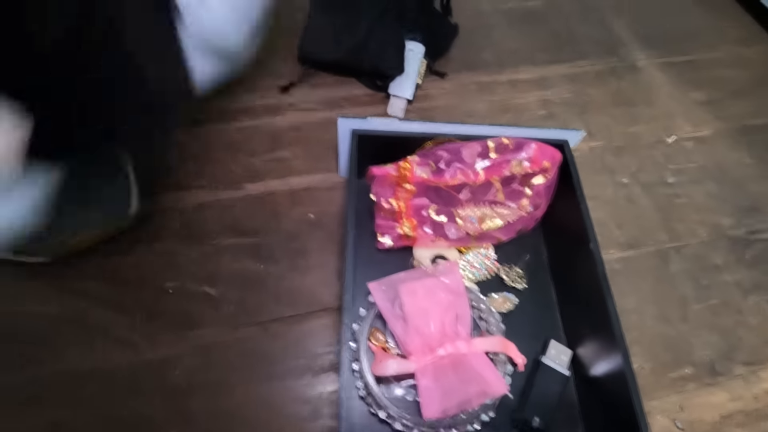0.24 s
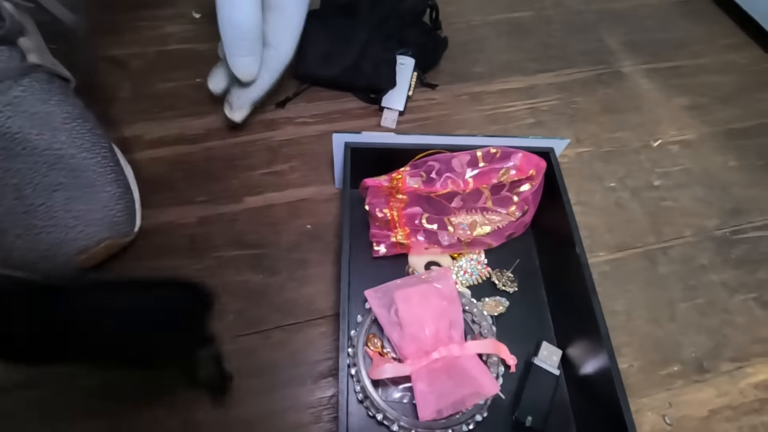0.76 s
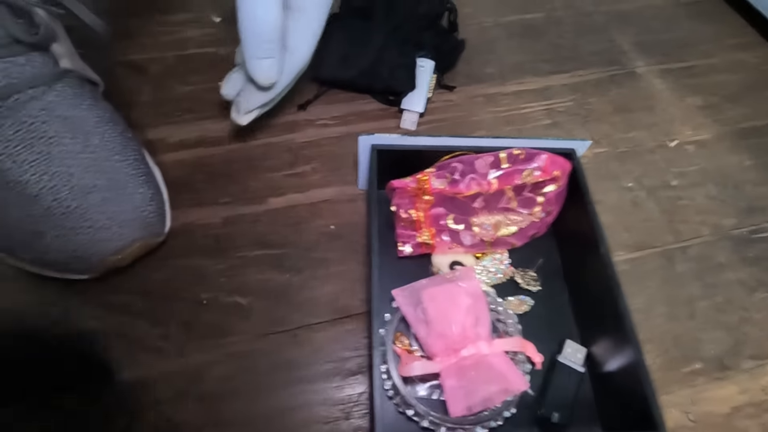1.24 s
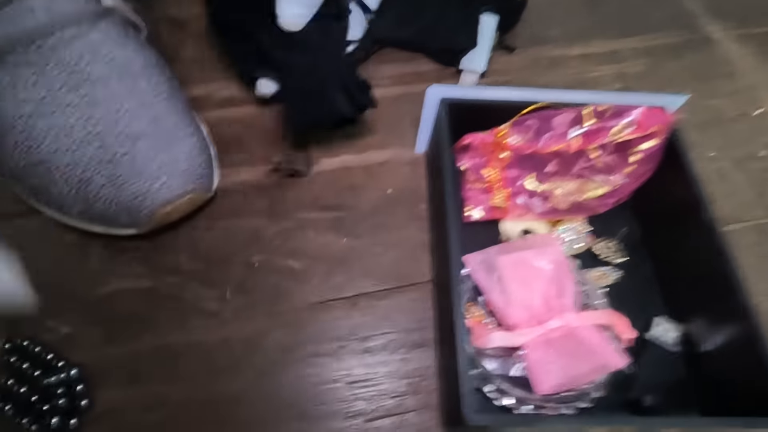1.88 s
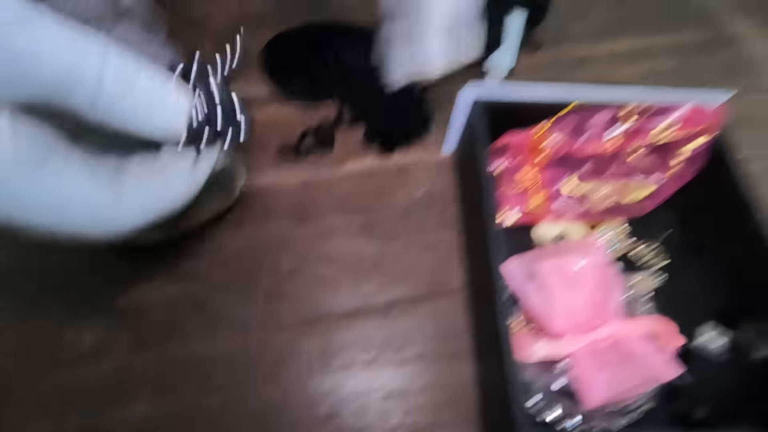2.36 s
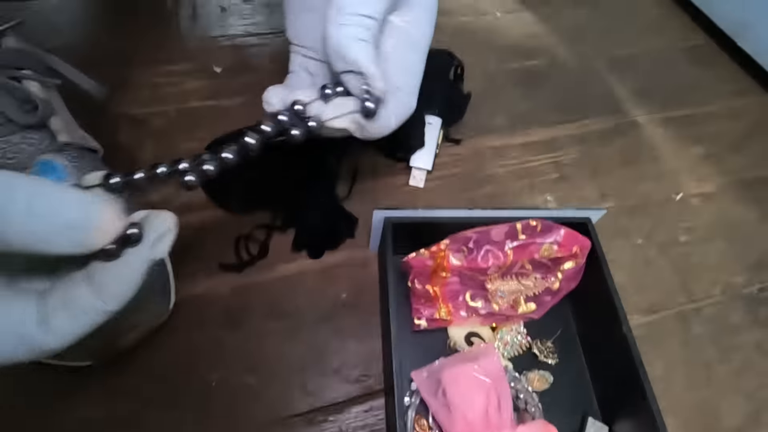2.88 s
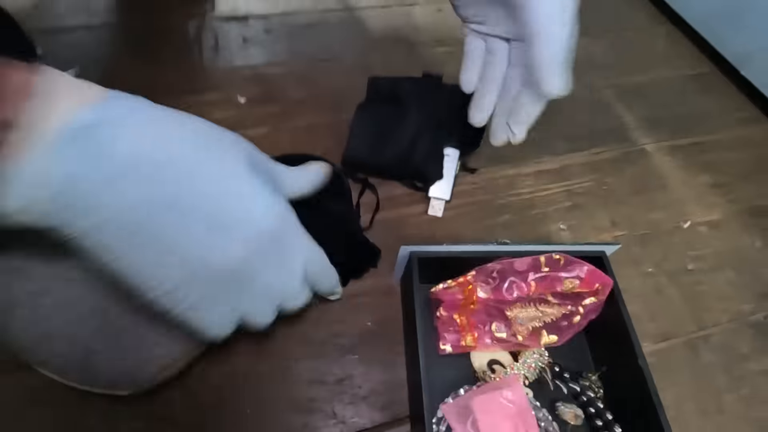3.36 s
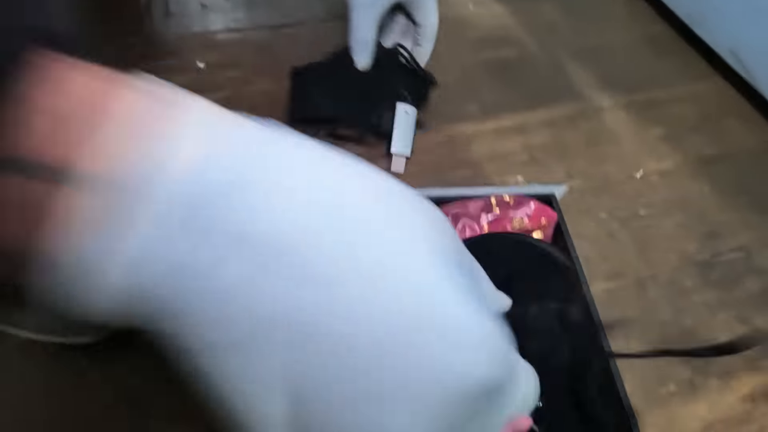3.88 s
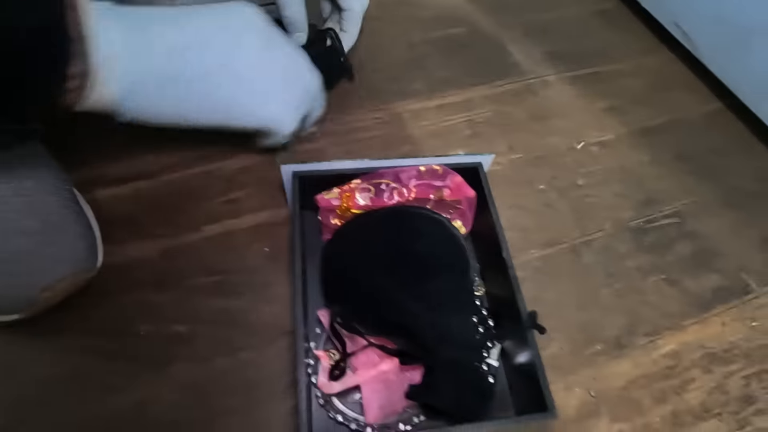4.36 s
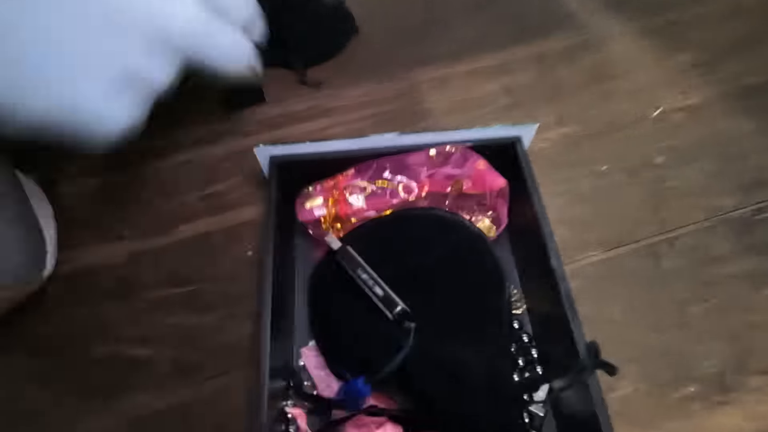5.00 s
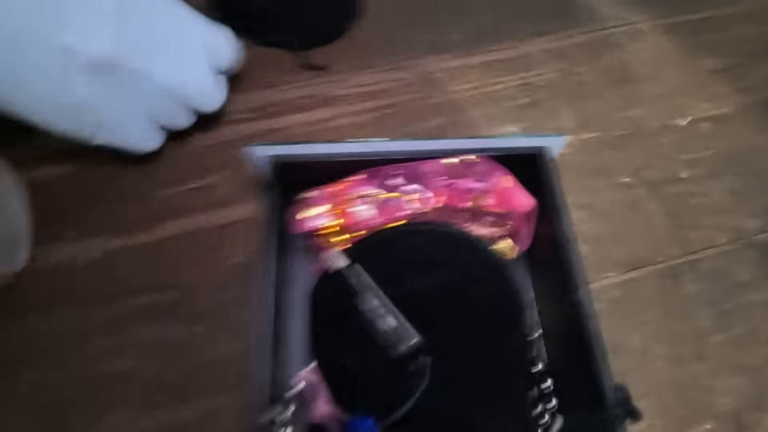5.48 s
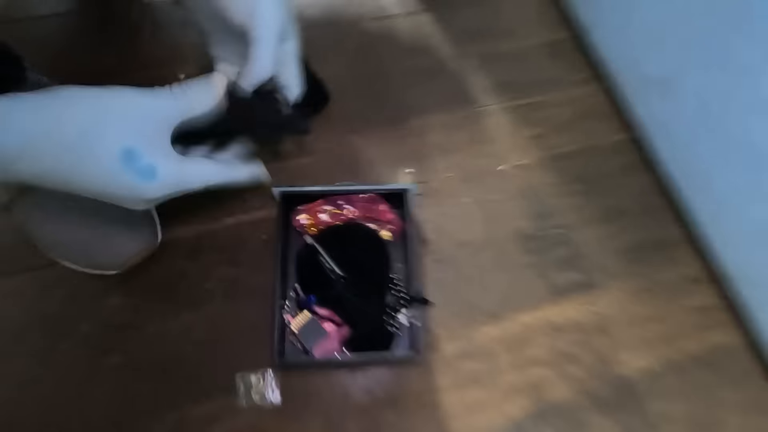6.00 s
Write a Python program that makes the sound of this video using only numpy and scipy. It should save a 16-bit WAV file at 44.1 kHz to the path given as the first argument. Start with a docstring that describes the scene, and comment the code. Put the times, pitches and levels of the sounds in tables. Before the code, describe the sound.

Gloved hands rustle cloth pouches and click beads in a bare room, dropping them sharply into a box before tossing in small plastic things.

```python
"""Beads in a cloth pouch knock on a wooden floor as gloved hands sort jewellery in a bare room.
The string of beads is drawn out, clicking, and dropped into a box; small plastic things are tossed after it.
Impacts are modal: a noise crack excites decaying modes. Cloth, gloves and a sliding shoe are
stick-slip friction, filtered by colour or resonance. A diffuse tail and a low rumble give the room."""
import sys
import numpy as np
from scipy import signal
from scipy.fft import rfft, irfft, next_fast_len
from scipy.io import wavfile
from scipy.ndimage import uniform_filter1d

SR = 44100
rng = np.random.default_rng(int(sys.argv[2]) if len(sys.argv) > 2 else 0)


def dump(signal):
    """Clip the signal to [-1, 1] and save it as 16-bit WAV at the path in sys.argv[1]."""
    limited = np.clip(np.atleast_2d(signal).T, -1, 1)
    pcm = np.round(limited * 32767).astype(np.int16)
    wavfile.write(sys.argv[1], SR, pcm)


N = 275184
TIME = np.arange(N) / SR
HIT_SIZE = 8192  # samples given to one impact or tick
SPOT_DB, SPOT_Q = 2, 4.2  # usual strength and sharpness of the pitch favoured by the spot struck
GAP_SPREAD = 0.06  # unevenness of the gaps in a run, as a share of the gap
BOX_GAP_S, BOX_LOSS_DB = 0.003, 5.5  # from one contact at the box to the next

# Table levels are relative within their layer; layer gains may follow.
# Ringing modes of the floorboards: pitch_hz, level_db, t60_s
FLOOR_MODES = [(340, -12.5, 0.11), (385, -17.5, 0.07), (555, -11.5, .05), (1030, -6.5, .055),
               (1075, -19, 0.18), (1155, -8, 0.035), (1495, -5, 0.055), (1660, -7, 0.025),
               (2250, -13, .025)]


def from_db(db):
    """Decibels as an amplitude ratio."""
    return 10 ** (np.asarray(db) / 20)


def rms_one(x):
    """Normalisation to unit root-mean-square amplitude."""
    return x / np.sqrt(np.mean(x ** 2) + 1e-20)


def in_time(rows):
    """Linear interpolation of a time curve at every sample."""
    times, values = np.transpose(rows)
    return np.interp(TIME, times, values)


def swell(middle_s, length_s):
    """Gaussian envelope, down to exp(-2) one length either side of its middle."""
    return np.exp(-2 * np.minimum(((TIME - middle_s) / length_s) ** 2, 20))


def at_hz(points, hz):
    """Interpolation of a spectrum on a logarithmic frequency axis."""
    f, value = np.transpose(points)
    return np.interp(np.log(np.maximum(hz, 1)), np.log(f), value)


def colour(x, spectrum):
    """Causal minimum-phase filter: folding the cepstrum forward turns a magnitude into a response."""
    half = next_fast_len(x.shape[-1] // 2 + 1024)
    magnitude = from_db(at_hz(spectrum, np.linspace(0, SR / 2, half + 1)))
    cepstrum = irfft(np.log(magnitude))
    cepstrum[1:half] *= 2
    cepstrum[half + 1:] = 0
    response = np.exp(rfft(cepstrum))
    return irfft(rfft(x, 2 * half) * response)[..., :x.shape[-1]]


def resonance(x, hz, q):
    """Second-order resonance around one pitch, with unit gain at its peak."""
    return signal.lfilter(*signal.iirpeak(hz, max(q, 1), fs=SR), x)


def drift(rate):
    """Band-limited chance: normal random values, rate per second, joined by straight lines."""
    knots = rng.standard_normal(4096)
    return np.interp(TIME * rate, np.arange(len(knots)), knots)


def friction(per_s, spread_db, grain_share):
    """Stick-slip friction: fibres catch and slip as clicks of uneven size within a smooth hiss."""
    sizes = from_db(spread_db * np.minimum(rng.exponential(1, N), 4)) * rng.choice([-1, 1], N)
    chance = per_s * from_db(4 * drift(35)) / SR
    grains = sizes * (rng.random(N) < chance)
    smooth = rng.standard_normal(N)
    share = np.clip(grain_share, 0, 1)  # share of the power
    return np.sqrt(share) * rms_one(grains) + np.sqrt(1 - share) * rms_one(smooth)


def evened(burst):
    """Spectral whitening: broad humps of a noise burst are levelled and only fine detail stays random."""
    power = uniform_filter1d(np.abs(rfft(burst)) ** 2, size=110)
    inverse_db = -10 * np.log10(power)
    return colour(burst, np.column_stack([np.linspace(1, SR / 2, len(power)), inverse_db]))


def runs(rows, gap_s, loss_db):
    """Repeated impact: a loose piece strikes at near-even gaps, losing level at each contact."""
    hits = []
    for s, contacts, level_db, *tone in rows:
        for k in range(round(contacts)):
            unevenness = min(k, 1) * GAP_SPREAD * rng.standard_normal()  # the first contact is on time
            hits.append((s + gap_s * (k + unevenness), level_db - loss_db * k, *tone))
    return hits


def strikes(hits, modes, crack, split_hz, crack_t60, ring_db, rattle_db, rattle_t60,
            size_spread=0, spot_db=SPOT_DB, spot_q=SPOT_Q):
    """Modal impact: a short contact crack and the body's decaying modes, then a rattle of tiny rebounds."""
    t, out = np.arange(HIT_SIZE) / SR, np.zeros(N + HIT_SIZE)
    attack = slice(0, 176)  # the first 4 ms, where levels are matched
    hz, mode_db, t60 = np.transpose(modes)[:, :, None]
    for s, level_db, bright_db, *spot in hits:
        noise, chatter = rng.standard_normal((2, HIT_SIZE))
        pressing = np.minimum(t / 0.00032, 1)  # the contact builds up over a moment
        contact = colour(evened(noise * pressing * from_db(-60 * t / crack_t60)), crack)

        strength = from_db(mode_db + rng.normal(0, 0.64, hz.shape)) * rng.choice([-1, 1], hz.shape)
        pitch = 1 + size_spread * rng.standard_normal()  # loose pieces differ in size
        partials = strength * np.sin(2 * np.pi * hz * pitch * t) * from_db(-60 * t / t60)
        ring = np.sum(partials, axis=0)
        hit = contact / np.std(contact[attack]) + from_db(ring_db) * ring / np.std(ring[attack])

        # tiny rebounds repeat the same sound, dying away
        rebounds = chatter ** 5 * from_db(-60 * t / rattle_t60) * np.minimum(t / 0.004, 1)
        rebounds = rebounds / np.linalg.norm(rebounds)
        hit = hit + from_db(rattle_db) * signal.fftconvolve(hit, rebounds)[:HIT_SIZE]

        # brightness tilts the treble about split_hz
        hit = colour(hit, [(split_hz / 2, 0), (split_hz * 2, bright_db)])
        for spot_hz in spot:
            hit = hit + from_db(spot_db) * resonance(hit, spot_hz, spot_q)
        start = int(s * SR)
        out[start:start + HIT_SIZE] += from_db(level_db) * hit / np.std(hit[attack])
    return out[:N]


def rumble():
    """Low-passed random pressure: the quiet background of the room."""
    # Level of the rumble: time_s, level_db
    rumble_level = [(0, -69.5), (2.5, -69.5), (3.3, -86), (4.2, -92), (5.1, -64.5), (6.24, -63)]
    # Its noise colour: frequency_hz, density_db
    rumble_spectrum = [(20, 15.5), (100, 19), (200, 3.5), (800, -48)]
    return from_db(in_time(rumble_level)) * rms_one(colour(rng.standard_normal(N), rumble_spectrum))


def room(x):
    """Diffuse reverberation: exponentially decaying noise, with its own decay time in each band."""
    # Reverberation time: frequency_hz, t60_s
    decay_times = [(100, 0.25), (170, 0.55), (400, 0.49), (1200, 0.77), (3000, 0.52), (6000, 0.48),
                   (12000, 0.29)]
    # Colour of the reverberation: frequency_hz, level_db
    tail_spectrum = [(60, -13.5), (170, 2), (350, 3.5), (700, -2.5), (1100, -9), (12000, -5)]
    t = np.arange(SR) / SR
    white, tail = rng.standard_normal((2, SR)), 0
    edges = np.geomspace(60, 16000, num=12)
    for k, (low, high) in enumerate(zip(edges, edges[1:])):
        band_filter = signal.butter(2, (low, high), "band", fs=SR, output="sos")
        noise = signal.sosfilt(band_filter, white[k % 2])
        tail = tail + noise * from_db(-60 * t / at_hz(decay_times, np.sqrt(low * high)))
    tail *= np.clip(t / 0.011, 0, 1)  # reflections build up over 11 ms
    return signal.fftconvolve(x, colour(tail / np.linalg.norm(tail), tail_spectrum))[:N]


def shoe():
    """Friction-driven resonance: the sole judders over the boards and wavering resonances swell."""
    # Resonances woken by the sliding sole: middle_s, length_s, pitch_hz, width_hz, level_db
    resonances = [(5.8, 0.07, 343, 48, -43), (5.22, 0.068, 345, 55, -35.5), (5.29, 0.12, 314, 39, -39),
                  (4.52, 0.038, 590, 110, -40), (5.32, 0.18, 1064, 47, -40.5), (5.8, 0.093, 580, 240, -45),
                  (5.28, 0.12, 1490, 290, -43.5)]
    # The soft sole makes little treble: frequency_hz, level_db
    sole_spectrum = [(2300, 0), (10000, -16)]
    slide_waver = 0.0099  # share by which the sole's pressure bends the pitch
    slips = colour(friction(per_s=540, spread_db=2.5, grain_share=0.32), sole_spectrum)
    bent_time = TIME + np.cumsum(slide_waver * drift(30)) / SR
    out = np.zeros(N)
    for s, length, hz, width_hz, level_db in resonances:
        ring = rms_one(resonance(slips, hz, hz / width_hz))
        out += from_db(level_db) * np.interp(bent_time, TIME, ring) * swell(s, length)
    return out


def cloth():
    """Friction in three bands: sleeves swish low, pouches rub mid, glove fibres crackle on top."""
    # How briskly the hands work the cloth: time_s, level_db
    handling_level = [(0.0, -56), (0.3, -51.5), (0.97, -59.5), (1.25, -48.5), (1.46, -81), (1.7, -55.5),
                      (2.75, -57.5), (2.94, -65), (3.14, -59.5), (3.42, -59.5), (3.7, -70), (3.94, -64.5),
                      (4.07, -58.5), (4.74, -59), (4.9, -57.5), (5.32, -52.5), (5.87, -53), (6.24, -58.5)]
    # A sleeve swishes as an arm reaches across: middle_s, length_s, level_db
    reaches = [(0.284, 0.17, -49), (0.675, 0.086, -51), (1.347, 0.2, -47), (3.068, 0.12, -48.5),
               (5.15, 0.58, -46.5), (5.82, 0.082, -44)]
    # Noise colours of the three bands: frequency_hz, density_db
    swish_spectrum = [(60, -42), (120, -10), (170, 5.5), (240, -2.5), (340, 4.5), (480, -7), (1500, -29)]
    rub_spectrum = [(200, -38), (500, 3), (950, -1.5), (1800, 4.5), (2800, -5.5), (4500, -9), (9000, -46.5)]
    hiss_spectrum = [(1200, -41), (2600, 6), (3800, 4), (5500, 1), (8000, -10), (12000, -17.5),
                     (16000, -20)]
    swish_db, rub_db, hiss_db = -0.5, 4, 2  # each band against its handling level
    rub_follows, usual_db = 0.96, -57.5  # rubbing takes this share of the swing about the usual level
    grip_db = 2.2

    handling_db = in_time(handling_level)
    rubbing_db = usual_db + rub_follows * (handling_db - usual_db)
    reaching = sum(from_db(db) * swell(s, length) for s, length, db in reaches)
    grip = from_db(grip_db * drift(55))  # the hold tightens and slips
    swish = rms_one(colour(rng.standard_normal(N), swish_spectrum))
    rub = rms_one(colour(friction(per_s=480, spread_db=3.5, grain_share=0.62), rub_spectrum))
    hiss = rms_one(colour(friction(per_s=1500, spread_db=4.5, grain_share=0.35), hiss_spectrum))
    swish = np.hypot(from_db(handling_db + swish_db), reaching) * swish
    rub = from_db(rubbing_db + rub_db) * rub
    hiss = from_db(handling_db + hiss_db) * hiss
    return grip * (swish + rub + hiss)


def gloves():
    """Granular friction: a finger or a run of beads drags over cloth in a swell with its own centre pitch."""
    # Short rubs of gloves and beads on cloth: middle_s, length_s, level_db, centre_hz
    strokes = [(0.033, 0.025, -41, 3860), (0.11, 0.025, -50, 4300), (0.32, 0.038, -46, 3500),
               (0.669, 0.077, -44.5, 1570), (1.031, 0.031, -38, 2500), (1.226, 0.051, -39, 1870),
               (1.804, 0.079, -47.5, 3120), (2.141, 0.03, -42, 3370), (2.244, 0.025, -35.5, 1580),
               (4.154, 0.031, -47.5, 2200), (4.892, 0.088, -44, 2370), (5.806, 0.055, -37.5, 3200),
               (6.152, 0.026, -47.5, 2780)]
    out, grains = np.zeros(N), friction(per_s=1300, spread_db=2.5, grain_share=0.94)
    for s, length, level_db, hz in strokes:
        near = np.abs(TIME - s) < 2 * length
        spectrum = [(hz / 12, -14), (hz / 7.6, -8), (hz, 0), (hz * 2.3, -9), (hz * 7, -33)]
        rub = rms_one(colour(grains[near], spectrum))
        out[near] += from_db(level_db) * rub * swell(s, length)[near]
    return out


def snags():
    """Sudden release of tension: a pouch fibre catches and lets go with a tiny, dry, pitched tick."""
    # Fibres snagging and letting go: start_s, peak_db, pitch_hz
    releases = [(0.0535, -30.5, 5300), (0.2468, -29.5, 2170), (0.3402, -25.5, 3000), (0.391, -26, 1690),
                (5.326, -29.5, 3400), (5.777, -24, 1700), (5.808, -27, 3200), (5.836, -29, 3600)]
    snag_t60_s, snag_q = 0.022, 2.4  # decay of the burst and clearness of its pitch
    t, out = np.arange(HIT_SIZE) / SR, np.zeros(N)
    for s, peak_db, hz in releases:
        burst = rng.standard_normal(HIT_SIZE) * from_db(-60 * t / snag_t60_s)
        snap = resonance(burst, hz, snag_q)
        start = int(s * SR)
        out[start:start + HIT_SIZE] += from_db(peak_db) * snap / np.abs(snap).max()
    return out


def squeaks():
    """Stick-slip oscillation: a glove on a smooth bead gives a brief, rough, falling note."""
    # Gloves squeaking on beads: middle_s, length_s, level_db, from_hz, to_hz
    notes = [(2.044, 0.0026, -34, 2610, 2200), (3.03, 0.02, -42.5, 2450, 2350)]
    out, wobble, slip = np.zeros(N), 1 + 0.07 * drift(700), drift(400)
    for s, length, level_db, from_hz, to_hz in notes:
        hz = np.interp(TIME, [s - length, s + length], [from_hz, to_hz]) * wobble
        tone = np.sqrt(2) * np.sin(2 * np.pi * np.cumsum(hz) / SR)
        out += from_db(level_db) * swell(s, length) * slip * tone
    return out


def bumps():
    """Soft impact: a long, yielding contact mainly excites the low modes of the boards."""
    # Dull bumps that reach the floor: start_s, level_db, brightness_db, favoured_pitch_hz
    contacts = [(1.6075, -35, 1, 368), (1.7515, -31, -10, 149), (2.074, -33, -16.5, 414),
                (2.3585, -26.5, 15, 680), (4.396, -31, -9, 282), (4.429, -37, 6, 450),
                (4.449, -35.5, 5, 350), (4.4875, -30.5, 8, 885), (4.494, -33, 0, 356),
                (4.513, -33.5, 3, 600), (5.492, -31.5, -16, 179.7), (6.085, -31, -5, 197)]
    # Low ringing modes: pitch_hz, level_db, t60_s
    low_modes = [(163, -10, 0.09), (345, 0, 0.055), (550, 3, 0.045), (860, -6, 0.02)]
    # Colour of the contact: frequency_hz, level_db
    crack = [(30, -14), (150, -7.5), (400, 5), (900, -5), (2000, -10), (8000, -35)]
    return from_db(-2.5) * strikes(
        contacts, low_modes, crack, split_hz=290, crack_t60=0.03,
        ring_db=-4.5, rattle_db=-5.5, rattle_t60=0.07)


def plastic():
    """Modal ringing of light, hollow bodies: each clink favours a clear pitch of its own."""
    # Small plastic things handled: start_s, level_db, brightness_db, favoured_pitch_hz
    clicks = [(0.0751, -32.5, -4, 3870), (4.033, -44, -12, 2850), (4.0595, -42, -12, 3980),
              (4.0965, -41.5, -34, 1770), (4.2059, -33.5, -11, 3070), (4.2255, -35, -6, 3100),
              (4.3705, -28, -10, 3230), (4.3714, -24.5, -6, 5440), (4.3893, -29, -12, 3720),
              (4.4075, -33, -4, 3230), (4.4163, -24, -3, 5960), (4.4285, -34.5, -11, 3100),
              (4.4328, -33, 6, 5500), (4.4384, -35, -8, 5910), (4.4462, -34, -9, 3800),
              (4.4525, -36, -13, 2100), (4.4731, -36, -10, 5840), (4.506, -32.5, 6, 4080),
              (4.5295, -33.5, -11, 2820), (5.418, -35, -6, 2580), (5.4702, -26, -1, 3700),
              (5.4816, -27.5, -4, 3250), (5.489, -30.5, -6, 2960), (5.5495, -37, -13, 2110),
              (5.9627, -23, -1.5, 2530), (5.9635, -15, 10, 5400), (6.0371, -40, -28, 1490)]
    # Ringing modes: pitch_hz, level_db, t60_s
    modes = [(1130, -8, 0.05), (2520, -2, 0.025), (5030, 3, 0.018), (5650, 1, 0.017), (6210, 2, 0.015),
             (11340, -17, 0.03)]
    # Colour of the contact: frequency_hz, level_db
    crack = [(100, -36), (400, -0.5), (1200, -1), (3000, 3), (6000, 7), (8000, -6), (12000, -13)]
    return strikes(
        clicks, modes, crack, split_hz=3100, crack_t60=0.018, ring_db=-4.5, rattle_db=-7,
        rattle_t60=0.046, size_spread=0.016, spot_db=9.5, spot_q=9.5)


def toss():
    """Hard impact with rebound: a small tossed piece lands against the box with a dry, solid knock."""
    # The piece touches, hits and rebounds: start_s, contacts, level_db, brightness_db
    landings = [(4.9371, 1, -21, -9), (4.9422, 2, -7, -0.5), (4.9552, 1, -16, 15.5)]
    # Ringing modes of the piece: pitch_hz, level_db, t60_s
    modes = [(586, -9, 0.065), (1655, -14, 0.054), (2090, -11, 0.06), (2800, -15, 0.06), (3750, -13, 0.036)]
    # Colour of its contact: frequency_hz, level_db
    crack = [(80, -25), (502, -4.5), (1270, 3.5), (2400, -9.5), (3830, -8.5), (6160, -29.5), (11500, -38),
             (14000, -54)]
    return from_db(-2.0) * strikes(
        runs(landings, BOX_GAP_S, BOX_LOSS_DB), modes, crack, split_hz=6400, crack_t60=0.02,
        ring_db=-8.5, rattle_db=-17, rattle_t60=0.046)


def box():
    """Forced panel modes: the box's floor and walls ring under whatever lands in it."""
    # Things landing and rebounding: start_s, contacts, level_db, brightness_db, favoured_pitch_hz
    landings = [(3.352, 1, -26, 4, 1000), (3.3626, 1, -16.5, 2, 1050), (3.3672, 1, -18, -9.5, 900),
                (3.3726, 1, -4.5, 11, 2110), (3.3881, 2, -13, 0, 2370), (3.3964, 3, -14, 6.5, 1700),
                (3.4605, 2, -18.5, 1, 1500), (3.4795, 1, -30, 2, 2000), (3.4858, 1, -15.5, 9, 3220),
                (3.4932, 3, -21, 5, 1870), (3.5075, 1, -22.5, 4, 1140), (3.512, 1, -28, 7, 3200),
                (3.5192, 1, -18, 1, 1490), (3.526, 3, -26, 0, 2100), (3.571, 1, -31, 5, 1990)]
    # Ringing modes of the box: pitch_hz, level_db, t60_s
    modes = [(337, -6, 0.03), (585, -11.5, 0.095), (875, 1, 0.024), (1000, 8.5, 0.015), (1370, -11, 0.045),
             (1530, -4.5, 0.024), (2290, -3, 0.019), (2730, -10.5, 0.045), (3160, -2.5, .024),
             (3860, -1.5, 0.02)]
    # Colour of the contact: frequency_hz, level_db
    crack = [(70, -24), (200, -22.5), (450, -9), (1000, 2.5), (2400, 2.5), (7000, -16.5), (12000, -24.5)]
    return from_db(-1.57) * strikes(
        runs(landings, BOX_GAP_S, BOX_LOSS_DB), modes, crack, split_hz=2800, crack_t60=0.018,
        ring_db=-5.0, rattle_db=-17.0, rattle_t60=0.05, size_spread=0.017, spot_db=2, spot_q=5.5)


def beads():
    """Chain of impacts: hard little beads snap together and jostle their neighbours along the string."""
    # Runs of bead against bead: start_s, contacts, level_db, brightness_db
    bead_runs = [(1.0459, 1, -39.5, -7), (1.0983, 1, -37, 2), (1.1931, 2, -29.5, -22),
                 (1.2249, 1, -25.5, -1), (2.2039, 3, -31, 5), (2.3463, 1, -33.5, -13),
                 (2.4458, 1, -35.5, -18), (2.4696, 1, -33.5, 19.5), (2.5148, 1, -35, 10),
                 (2.551, 1, -42, 10), (2.6217, 6, -22.5, 9), (2.7397, 1, -27.5, 22), (2.7564, 4, -30, 16.5),
                 (2.7974, 4, -29.5, 12), (2.846, 2, -32, 12.5), (2.883, 1, -34, 17), (2.926, 1, -45, 11),
                 (3.07, 1, -41.5, 2), (3.1738, 1, -27.5, 6), (3.198, 1, -34, 7), (3.2039, 4, -31.5, 6),
                 (3.3285, 1, -36, 15), (3.8977, 1, -41.5, -35), (3.9155, 1, -38.5, -10)]
    # Ringing modes of a bead: pitch_hz, level_db, t60_s
    modes = [(2980, -10.5, 0.017), (4540, 5, 0.0043), (7080, -8.5, 0.029), (11200, -8.5, 0.027)]
    # Colour of the contact: frequency_hz, level_db
    crack = [(100, -16), (900, -8), (1800, -1.5), (3200, 8), (6500, 5.5), (12000, -2.5)]
    hits = runs(bead_runs, gap_s=0.0105, loss_db=1.5)
    return strikes(
        hits, modes, crack, split_hz=10500, crack_t60=0.017, ring_db=-6.5, rattle_db=-7.5,
        rattle_t60=0.025, size_spread=0.035)


def clacks():
    """Contact hardness: bare beads excite the same boards as the pouch, with a harder crack."""
    # Bare beads clacking on the boards: start_s, level_db, brightness_db, favoured_pitch_hz
    contacts = [(1.2465, -30, -2, 1810), (1.9855, -33.5, 4, 2120), (2.1415, -23.5, -12, 2340),
                (2.1687, -26, 11, 2190), (2.1818, -15.5, 7, 2280), (2.189, -28, 18, 940),
                (2.1993, -25.5, 6, 1400), (2.2376, -29, 2, 1900), (2.2485, -26.5, -12, 2800),
                (2.2625, -29.5, -11, 520), (2.2717, -18, -9, 2210), (2.282, -33, -16, 950),
                (2.2985, -30, 4, 3000)]
    # Colour of the contact: frequency_hz, level_db
    crack = [(100, -28.5), (220, -20), (380, 6), (800, 0), (2200, 3), (4000, -6), (7000, -19),
             (12000, -26.5)]
    return from_db(-1.46) * strikes(
        contacts, FLOOR_MODES, crack, split_hz=4500, crack_t60=0.016,
        ring_db=-8.5, rattle_db=-8.5, rattle_t60=0.059)


def pouch():
    """Cushioned impact: heavy beads thud on the boards through cloth that muffles the contact."""
    # Knocks through the pouch: start_s, contacts, level_db, brightness_db, favoured_pitch_hz
    knocks = [(1.3455, 1, -29.5, -10, 422), (1.3491, 1, -12, 11.5, 1420), (1.3541, 1, -13.5, 12, 1030),
              (1.3587, 2, -16, -5, 1450), (1.4215, 2, -19.5, 0.5, 356), (1.4688, 1, -29, 1.5, 2070),
              (1.6278, 1, -27, -2, 1800), (1.6548, 2, -13.5, 7, 1150), (1.6853, 1, -29, 2, 2300),
              (1.7506, 1, -29, 15, 1620), (1.7636, 2, -23.5, 9, 1730)]
    # Colour of the contact: frequency_hz, level_db
    crack = [(200, -26.5), (360, 7.5), (800, -2.5), (1500, 1), (2100, -4.5), (3500, -13.5), (7000, -33),
             (12000, -39.5)]
    hits = runs(knocks, gap_s=0.0047, loss_db=11)
    return strikes(
        hits, FLOOR_MODES, crack, split_hz=2600, crack_t60=0.018, ring_db=-3.0, rattle_db=-10.0,
        rattle_t60=0.077, size_spread=0.014)


def scene():
    """Superposition of near sources and their reverberation; the ears differ mostly in the top octave."""
    # Stereo width: frequency_hz, side_gain_db
    side_spectrum = [(100, -32), (1500, -46), (5000, -26), (8000, -22), (10800, -13), (11900, 0)]
    knocks = pouch() + clacks() + bumps()
    drops = box()
    small = plastic() + toss()
    clicks = beads() + gloves() + squeaks() + snags()
    room_send = (from_db(-12.5) * knocks + from_db(-7.5) * drops
                 + from_db(-12.0) * clicks + from_db(-14) * small)
    handling = knocks + drops + small + clicks + room(room_send)
    # a low cut at 87 Hz thins the bass of all impacts, rubs and their reverberation
    low_cut = signal.butter(2, 87, "high", fs=SR, output="sos")
    handling = signal.sosfilt(low_cut, handling)
    mid = from_db(0.05) * handling + cloth() + shoe() + rumble()
    side = colour(mid * drift(400), side_spectrum)
    return np.array([mid + side, mid - side])


def record(dry):
    """Linear filtering and saturation: microphone ports notch the treble, full scale clips, the top is cut."""
    # Response of the microphone ports: frequency_hz, level_db
    port_response = [(6500, 0), (8200, -2), (9050, -14), (9900, -4), (11600, 3), (12800, -3), (14000, -26),
                     (16000, -38)]
    heard = np.clip(colour(dry, port_response), -1, 1)
    top_cut = signal.cheby2(14, 70, 16200 * 1.04, fs=SR, output="sos")  # 70 dB down from this frequency up
    return signal.sosfilt(top_cut, heard)


dry = scene()
out = record(dry)
dump(out)
```